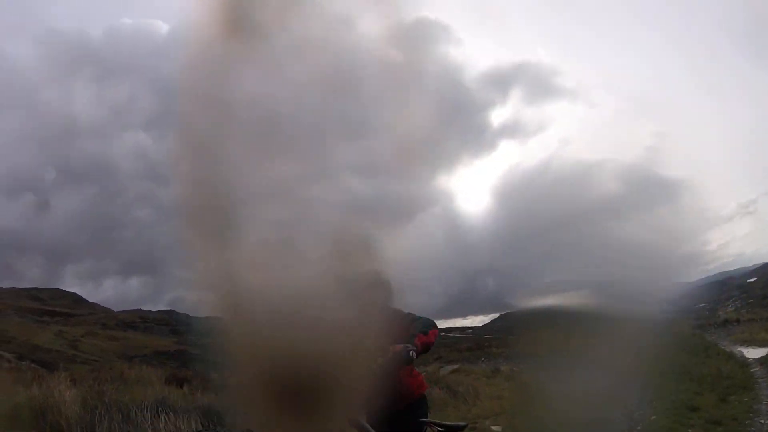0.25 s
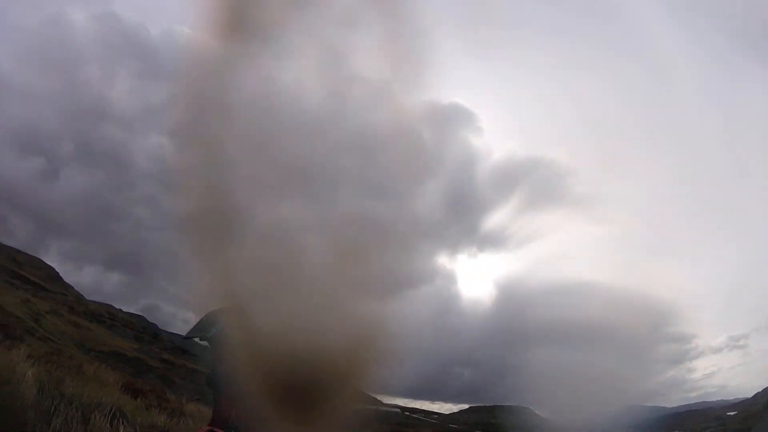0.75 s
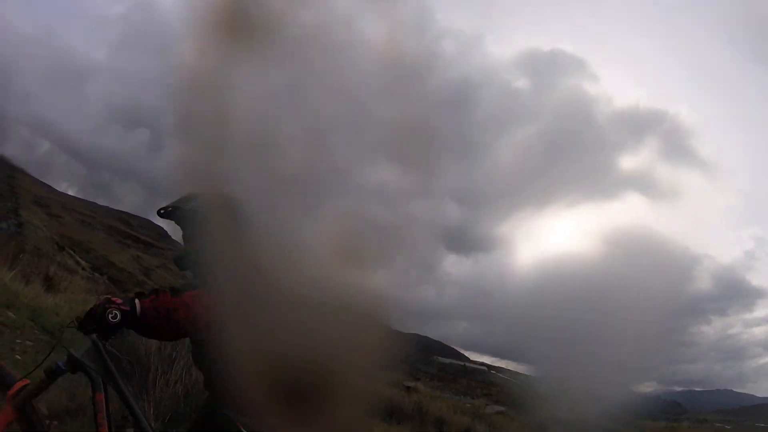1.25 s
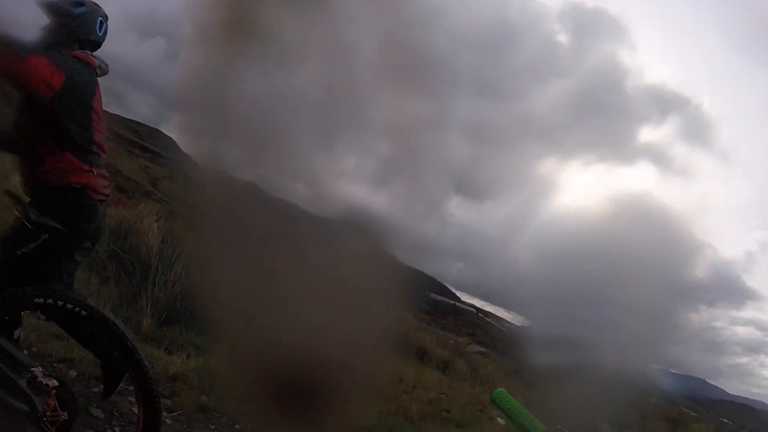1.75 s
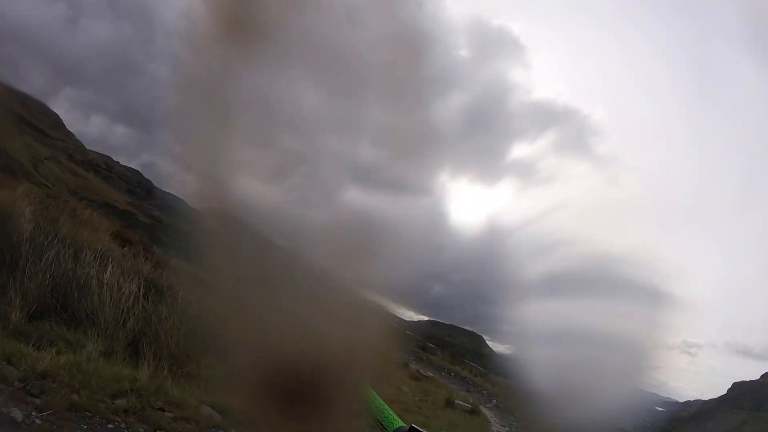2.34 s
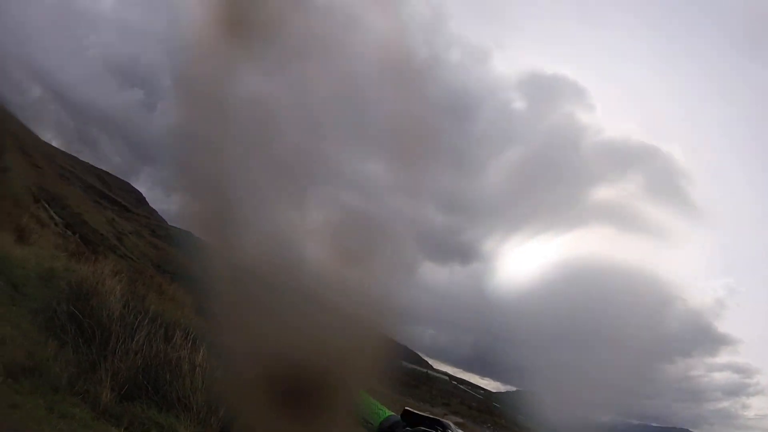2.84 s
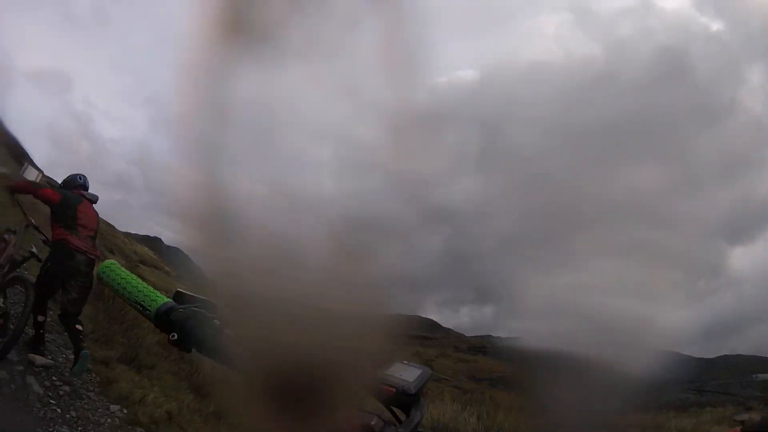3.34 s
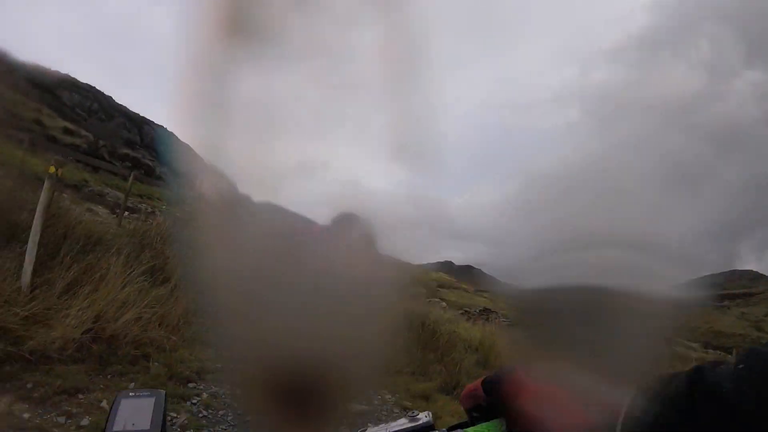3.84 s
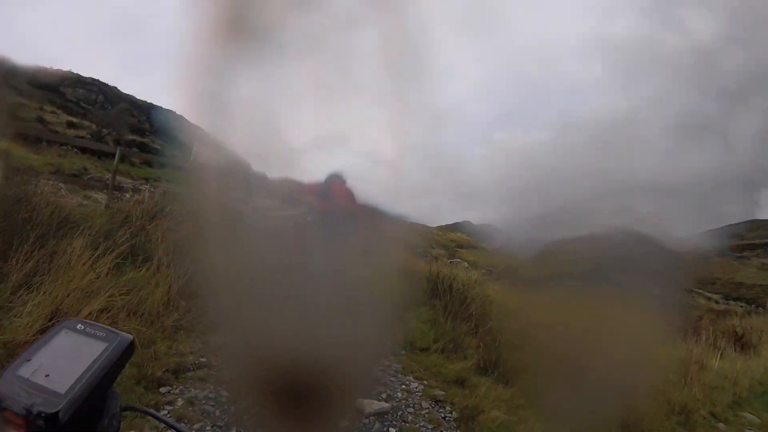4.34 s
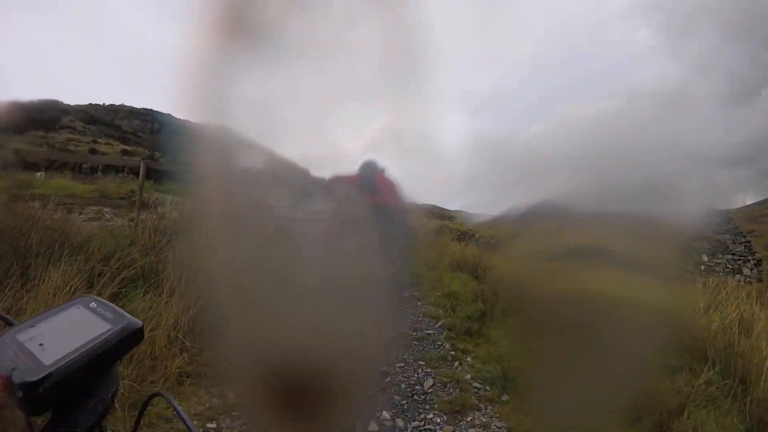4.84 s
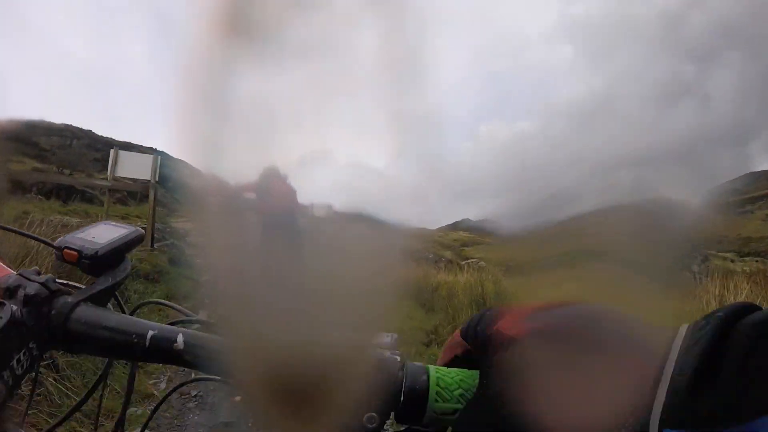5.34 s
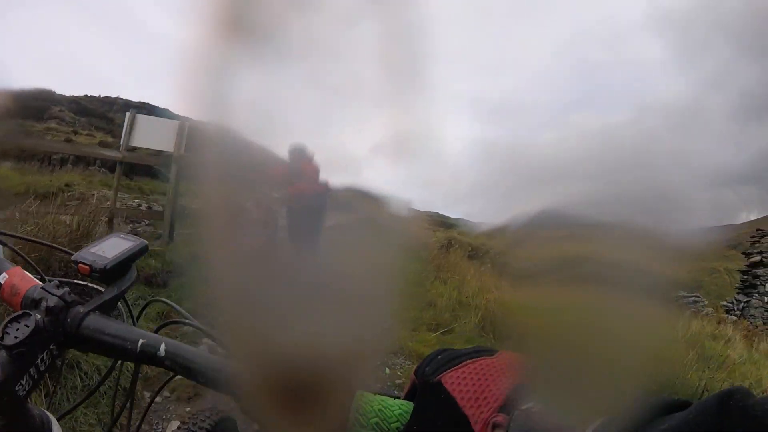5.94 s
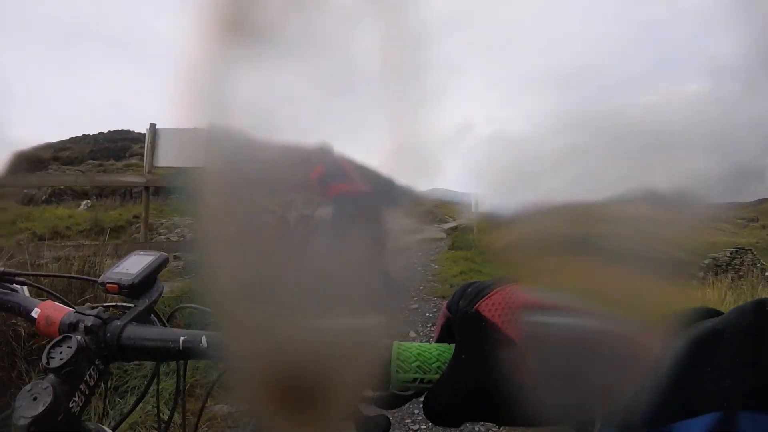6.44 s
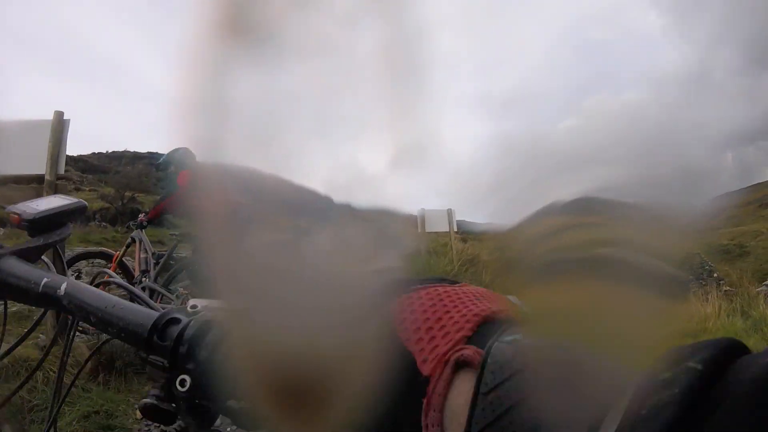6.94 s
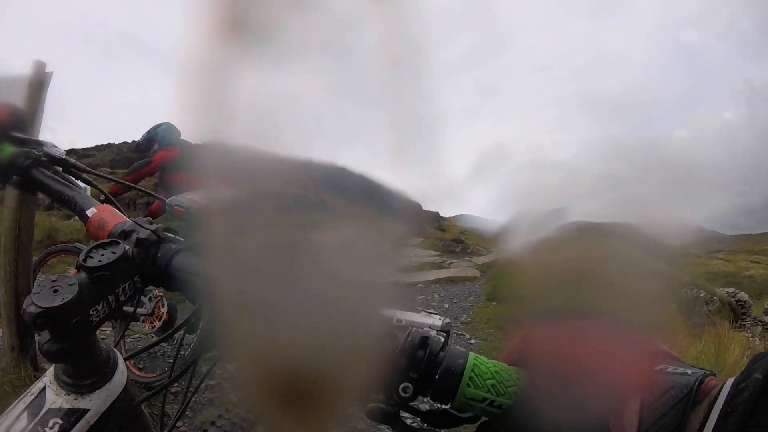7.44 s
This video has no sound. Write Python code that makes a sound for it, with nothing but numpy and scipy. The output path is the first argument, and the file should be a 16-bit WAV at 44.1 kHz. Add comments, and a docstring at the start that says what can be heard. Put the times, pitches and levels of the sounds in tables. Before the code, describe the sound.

Close, dry outdoor sound from a chest microphone: rumbling, uneven wind with heavy pressure pulses almost masks bikes being wheeled over loose stones. A crisp freewheel ticks from just under a second to the end. A hard knock comes past two seconds, then a cluster of stony cracks near four, and frequent boot steps on gravel afterwards.

```python
"""Gusts buffet a microphone port on a rider's chest while mountain bikes are wheeled up a stony moor track.
A freewheel ticks, tyres crunch loose stones, boots land on gravel; snaps, clunks, pings and a scrape are sparse.
Wind is banded noise with eddies, plus single pressure pulses. Stones are random clicks, coloured or ringing.
Tyres, freewheel and boots pass through the resonances of the microphone housing."""
import sys
import numpy as np
from scipy import signal
from scipy.fft import rfft, irfft, next_fast_len
from scipy.io import wavfile
from scipy.ndimage import uniform_filter1d

SR = 44100
rng = np.random.default_rng(int(sys.argv[2]) if len(sys.argv) > 2 else 0)


def transcribe(u):
    """Save the signal u as a 16-bit wav file named by the first command-line argument.

    u: samples, shape (n,) or (channels, n), limited to [-1, 1]; the rate is SR.
    q: integer samples, one column per channel.
    """
    v = np.clip(np.atleast_2d(u).T, -1, 1)
    q = np.round(v * 32767).astype(np.int16)
    wavfile.write(sys.argv[1], SR, q)


N = 338688

# Gusts at the port. Each row: start in seconds, time until the fall in seconds, rumble level in dB,
# edge (extra treble) in dB.
GUSTS = [(-0.03, 0.11, -14.5, -2), (0.135, 0.015, -30, -19), (0.275, 0.017, -25, -6.5),
         (0.392, 0.085, -11.5, -5.5), (0.472, .25, -18, 6), (0.733, 0.11, -21.5, 9),
         (0.861, 0.04, -28, 4.5), (0.919, 0.19, -26.5, 9), (1.126, 0.088, -22.5, 9),
         (1.217, 0.085, -20.5, 8), (1.343, 0.08, -24, 7), (1.46, 0.11, -28, -13.5),
         (1.639, 0.025, -15.5, -6), (1.733, 0.3, -28, 0.5), (2.136, 0.09, -40.5, -11.5),
         (2.429, 0.058, -23.5, -6), (2.551, 0.036, -28, -8.5), (2.681, 0.02, -24.5, -14.5),
         (2.852, 0.049, -20, 1), (2.947, 0.11, -20.5, 0.5), (3.122, 0.21, -32, 10),
         (3.229, 0.055, -15.5, 4.5), (3.292, 0.077, -16.5, 13), (3.378, 0.14, -24, 8.5),
         (3.672, 0.071, -22.5, 4.5), (3.889, 0.19, -23.5, 1), (4.172, 0.39, -29, 4), (4.468, 0.094, -22, 0),
         (4.618, 0.25, -25, 7), (5.172, 0.12, -22.5, -7), (5.374, 0.29, -24.5, 0.5),
         (5.676, 0.092, -16.5, -4.5), (5.84, 0.061, -32.5, 3.5), (6.018, 0.083, -24, -8),
         (6.225, 0.08, -28.5, -11), (6.349, 0.032, -18.5, -1.5), (6.587, 0.07, -25.5, 0),
         (6.7, 0.052, -22.5, -1), (6.777, 0.1, -28, -10.5), (6.929, 0.17, -24, -3),
         (7.15, 0.057, -28.5, -3.5), (7.336, 0.032, -22.5, -3), (7.468, 0.25, -25, -7.5)]
# Breeze between the gusts. Each row: time in seconds, rumble level in dB.
CALM = [(0, -37.5), (2.8, -38.5), (3.3, -24.5), (5.0, -29.5), (7.68, -31.5)]
# Wind spectrum before the edge. Each row: frequency in Hz, relative density in dB.
WIND_SPECTRUM = [(14, 3), (25, 2), (60, 4.5), (110, 0), (220, -7.5), (450, -21), (900, -40), (1800, -63.5),
                 (3000, -74.5), (4500, -85)]
GUST_RISE_S, GUST_FALL_S, CALM_EDGE_DB = 0.019, 0.016, -6
PUSH_SKEW = 0.066  # share of squared churn: pushes taller than pulls

# Strong single eddies. Each row: time in seconds, push level in dB, tear level in dB.
THUMPS = [(0.072, -6, -26), (0.476, -13, -20), (0.518, -16, -4.5), (0.598, -20, -7), (0.704, -23, -10),
          (0.75, -3, -12), (0.835, -5.5, -21), (0.942, -7, -15), (1.238, -8.5, -20), (1.294, -6.5, -25),
          (3.022, -7.5, -13), (4.037, -9, -29.5), (4.499, -11.5, -14), (4.559, -9, -24), (4.713, -3, -16),
          (4.743, -12, -18.5), (4.864, -10, -15), (6.406, -16, -50)]
# Ragged tear on a thump. Each row: frequency in Hz, relative density in dB.
TEAR_SPECTRUM = [(250, 10), (600, 6.5), (1000, -1.5), (1800, -19.5), (3000, -32), (5000, -66)]
THUMP_S, TEAR_T60_S = 0.01154, 0.024

# Boots, knocked stones and, near 0.49 s, a rough burst of wind. Each row: time in seconds,
# crack level in dB, knock level in dB, crunch t60 in seconds, knock pitch in Hz.
STEPS = [(0.45, -46, -11.5, 0.05, 2600), (0.491, -39, -13, 0.13, 880), (2.346, -39, -4, 0.012, 690),
         (3.336, -40.5, -25, 0.2, 885), (3.44, -32.5, -24, 0.16, 2540), (3.843, -29, -5.5, 0.039, 1700),
         (3.878, -29, -8, 0.021, 2000), (3.904, -34, -18, 0.093, 1520), (3.967, -33, -16.5, 0.091, 1200),
         (4.445, -35, -22.5, 0.15, 1000), (4.785, -34.5, -25, 0.18, 2400), (4.902, -37, -14.5, 0.092, 1420),
         (5.136, -38, -18, 0.074, 2160), (5.242, -32, -15, 0.018, 1700), (5.292, -31, -10.5, 0.075, 786),
         (5.535, -39, -17.5, 0.068, 1890), (5.7192, -23, -14, 0.076, 1020),
         (5.7571, -48, -9.5, 0.014, 1460), (6.103, -25, -13.5, 0.076, 1270), (6.171, -34, -22, 0.036, 1350),
         (6.5072, -27.5, -10, 0.046, 700), (6.779, -30.5, -17.5, 0.049, 1730),
         (6.894, -24, -8, 0.079, 1330), (7.067, -39, -22.5, 0.1, 880), (7.278, -32.5, -20, 0.11, 1780),
         (7.3026, -28, -9.5, 0.046, 1650)]
# Cracking part of a step. Each row: frequency in Hz, gain in dB.
CRACK_SPECTRUM = [(800, -8), (1600, -20.5), (3000, 4), (4200, -10), (6000, -1), (9000, -3), (11000, -29),
                  (12500, -50)]
# Knocking part of a step. Each row: frequency in Hz, gain in dB.
KNOCK_SPECTRUM = [(180, -40), (380, 1.5), (650, -3.5), (1000, -11), (1400, -13.5), (2200, -17),
                  (3500, -38.5)]
SOLID_T60_S = 0.021  # the opening click has knock level at this t60, more at shorter ones
KNOCK_WIDTH, KNOCK_RING_DB = 0.51, 8.5  # width as a share of pitch; ring gain before colouring

# Turning of the freewheel. Each row: time in seconds, teeth passed as a running count.
WHEEL_TURN = [(.7458, 0), (.935, 5), (1.1428, 11), (1.2347, 14), (1.341, 17), (1.524, 22), (1.8536, 32),
              (2.006, 37), (2.3206, 48), (2.4667, 53), (2.7137, 62), (2.9337, 71), (3.1073, 77),
              (3.204, 80), (3.4405, 88), (3.5533, 92), (3.8082, 102), (4.4387, 126), (7.1246, 224),
              (7.67, 244)]
# Nearness of the freewheel. Each row: time in seconds, tick level in dB.
TICK_LEVEL = [(.75, -33), (1.0, -35), (1.3, -32), (1.75, -27), (2.3, -35), (2.85, -39), (3.1, -33),
              (3.5, -35.5), (4.5, -34.5), (7.68, -28.5)]
# Pawl on tooth. Each row: frequency in Hz, gain in dB.
PAWL_SPECTRUM = [(900, -68.5), (1600, -20.5), (2600, -8.5), (4200, -22.5), (5500, -12), (8500, -11),
                 (10500, -22.5), (13500, -73.5)]
TICK_SPREAD_DB, TICK_JITTER_S = 1, 0.0019  # standard deviations

# Tyres on loose stones. Each row: time in seconds, fine grit level in dB, coarse stone level in dB.
ROLL = [(0, -44.5, -57), (.2, -50.5, -65), (.5, -46, -51.5), (.94, -56, -71.5), (1.6, -53.5, -65),
        (2.4, -49, -58), (2.9, -50, -64), (3.55, -49, -62.5), (3.94, -40.5, -48.5), (4.2, -47, -60),
        (4.9, -43.5, -56), (6.1, -42.5, -53), (6.45, -44.5, -56), (6.8, -44, -54.5), (7.68, -46, -56.5)]
# Fine grit. Each row: frequency in Hz, gain in dB.
GRIT_SPECTRUM = [(1500, -5.5), (3000, -24), (4200, -16), (5500, -12), (8500, -11.5), (10500, -21),
                 (12500, -41.5)]
# A tyre brushes through grass. Each row: start in seconds, time until the fall in seconds, level in dB.
GRASS_SWISHES = [(0.238, 0.14, -42), (2.44, 0.19, -42.5)]
SWISH_EDGE_S, COARSE_TOP_HZ = 0.029, 3310

# Lone sharp snaps close to the port. Each row: time in seconds, level in dB.
SNAPS = [(0.41, -31), (0.4431, -23.5), (0.698, -23.5), (0.795, -33), (2.3461, -24)]
SNAP_T60_S, SNAP_TOP_HZ = 0.005, 5270

# Hollow clunks of single stones or the frame. Each row: time in seconds, level in dB, pitch in Hz.
CLUNKS = [(2.333, -39, 1860), (2.392, -37.5, 900), (2.461, -37.5, 1220), (2.585, -35.5, 656),
          (2.595, -36, 1220), (2.623, -42, 1280), (2.718, -40.5, 1370), (4.037, -35, 1300),
          (5.994, -34, 2060), (6.601, -36.5, 900)]
CLUNK_T60_CYCLES = 28

# Tiny metallic pings. Each row: time in seconds, level in dB, pitch in Hz.
PINGS = [(2.4862, -37, 4840), (3.2041, -41, 5300), (3.3503, -37, 5180)]
PING_T60_S = 0.029

# Narrow scraping hiss. Each row: start in seconds, time until the fall in seconds, level in dB.
SCRAPES = [(0.662, 0.12, -53)]
SCRAPE_HZ, SCRAPE_WIDTH_HZ = 2070, 220

# Cavities around the port. Each row: resonance in Hz, width in Hz, gain in dB.
HOUSING_MODES = [(5277, 610, 8), (6540, 243, 11.5)]
CAPSULE_HISS_DB = -75.0
CEILING = .58  # full scale = 1
STOP_HZ = 14500  # 60 dB down from here up


def wind():
    """Turbulent pressure at the port: eddies modulate each band, and each gust's edge lifts or cuts the treble."""
    calm = from_db(in_time(CALM)[0])
    strength, weighted_edge = calm, calm * CALM_EDGE_DB
    for start_s, hold_s, db, gust_edge_db in GUSTS:
        blow = from_db(db) * swell(start_s, hold_s, GUST_RISE_S, GUST_FALL_S)
        strength = strength + blow
        weighted_edge = weighted_edge + blow * gust_edge_db
    edge_db = weighted_edge / strength
    lumps, flutter, total = drift(4.7), drift(94.0), 0
    for hz, band in bands(grit(300, 2.2, hiss=0.89), 17.45, count=17):
        height = max(np.log(hz / 85) / np.log(5.0), 0)  # 0 up to 85 Hz, 1 at 425 Hz
        shared_db = (0.98 + 2.1 * height) * lumps + 3.53 * height * flutter
        own_db = (1.98 + 1.4 * height) * drift(33.3)
        band_db = at_hz(WIND_SPECTRUM, hz) + height * edge_db + shared_db + own_db
        total = total + from_db(band_db) * band
    churn = rms_one(total)
    power = churn ** 2
    return strength * (churn + PUSH_SKEW * (power - uniform_filter1d(power, size=2000)))


def thumps():
    """Each eddy is one push and pull of pressure, with a ragged tear that reaches into the mids."""
    s, push_db, tear_db = np.transpose(THUMPS)
    at = (s * SR).astype(int)
    pushes, tears = np.zeros((2, N))
    pushes[at] = from_db(push_db)
    tears[at] = from_db(tear_db)
    turn = np.linspace(0, 1, int(THUMP_S * SR))
    pulse = np.sin(2 * np.pi * turn) * np.sin(np.pi * turn)
    push = signal.fftconvolve(pushes, pulse)[:N]
    tear_level = signal.fftconvolve(tears, burst(TEAR_T60_S, rise_s=0.003))[:N]
    return push + tear_level * rms_one(coloured(rng.standard_normal(N), TEAR_SPECTRUM))


def boots_and_burst():
    """Stones crack underfoot and knock at their own pitch; one rough burst of wind is made the same way."""
    crack_level, knocks = np.zeros((2, N + SR))
    cracks = np.pad(grit(4000, 3.9, hiss=0.55), (0, SR))
    for s, crack_db, knock_db, t60_s, hz in STEPS:
        crunch = burst(t60_s, rise_s=0.097 * t60_s)  # longer ones build more slowly
        first = round(s * SR)
        at = slice(first, first + len(crunch))
        crack_level[at] += from_db(crack_db) * crunch
        blow = from_db(knock_db) * burst(t60_s, rise_s=0.098 * t60_s) * cracks[at]
        blow[0] = from_db(knock_db) * (SOLID_T60_S / t60_s) ** 2
        ring = from_db(KNOCK_RING_DB) * resonance(blow, hz, KNOCK_WIDTH * hz)
        knocks[at] += blow + ring
    crunches = coloured((crack_level * cracks)[:N], CRACK_SPECTRUM)
    return crunches + coloured(knocks[:N], KNOCK_SPECTRUM)


def freewheel():
    """Each pawl snaps over a tooth: a short rattle of hiss."""
    s, teeth = np.transpose(WHEEL_TURN)
    tooth = np.arange(int(teeth[-1]) + 1)
    time_chance, level_chance = rng.standard_normal((2, len(tooth)))
    tick_s = np.interp(tooth, teeth, s) + TICK_JITTER_S * time_chance
    at = (tick_s * SR).astype(int)
    clicks = np.zeros(N)
    clicks[at] = from_db(in_time(TICK_LEVEL)[0][at] + TICK_SPREAD_DB * level_chance)
    level = signal.fftconvolve(clicks, burst(0.031, rise_s=0.0015))[:N]
    return coloured(level * grit(7100, 1.0, hiss=0.25), PAWL_SPECTRUM)


def tyres():
    """Dense grit shifts in clumps, louder through grass; coarse stones sound lower and sparser."""
    fine_db, coarse_db = in_time(ROLL)
    grass = sum(from_db(db) * swell(start_s, hold_s, SWISH_EDGE_S, SWISH_EDGE_S)
                for start_s, hold_s, db in GRASS_SWISHES)
    fine = coloured(grit(2500, 1.4, hiss=0.58) * from_db(2 * drift(15)), GRIT_SPECTRUM)
    coarse = knocked(grit(1200, 2.3, hiss=1.7) * from_db(2.8 * drift(26.0)))
    low_pass = signal.butter(4, COARSE_TOP_HZ, fs=SR, output="sos")
    coarse = signal.sosfilt(low_pass, coarse)
    return np.hypot(from_db(fine_db), grass) * fine + from_db(coarse_db) * coarse


def knocked(x):
    """Larger stones: each sample of x goes at random to one of a dozen short rings; rms 1."""
    dealt = rng.integers(0, 12, N)
    pitches_hz = np.geomspace(700, 3400, 12)
    return rms_one(sum(resonance(x * (dealt == k), hz, 0.26 * hz) for k, hz in enumerate(pitches_hz)))


def snaps():
    """Very short noise cracks with the top rolled off, as of a buckle or strap against the housing."""
    out = np.zeros(N)
    for s, db in SNAPS:
        crack = from_db(db) * burst(SNAP_T60_S, rise_s=.0001)
        out[round(s * SR):][:len(crack)] += crack * rng.choice([-1, 1], len(crack))
    return signal.sosfilt(signal.butter(2, SNAP_TOP_HZ, fs=SR, output="sos"), out)


def clunks():
    """Each is a decaying tone roughened by noise around the same pitch."""
    out = np.zeros(N)
    for s, db, hz in CLUNKS:
        fall = burst(CLUNK_T60_CYCLES / hz, rise_s=0.00053)
        tone = np.sin(2 * np.pi * hz * np.arange(len(fall)) / SR)
        rough = 0.51 * resonance(3.4 * rng.standard_normal(len(fall)), hz, 0.45 * hz)
        out[round(s * SR):][:len(fall)] += from_db(db) * fall * (tone + rough)
    return out


def pings():
    """Short pure rings, as of a spoke or cable flicked by grit."""
    out, fall = np.zeros(N), burst(PING_T60_S, rise_s=0.00081)
    for s, db, hz in PINGS:
        tone = np.sin(2 * np.pi * hz * np.arange(len(fall)) / SR)
        out[round(s * SR):][:len(fall)] += from_db(db) * fall * tone
    return out


def scrapes():
    """Uneven grit through two resonances at one pitch, narrow then wider."""
    level = sum(from_db(db) * swell(start_s, hold_s, 0.0048, 0.081) for start_s, hold_s, db in SCRAPES)
    rub = grit(1500, 3.1, hiss=0.37) * from_db(7.4 * drift(25))
    narrow = resonance(rub, SCRAPE_HZ, SCRAPE_WIDTH_HZ)
    return level * rms_one(resonance(narrow, SCRAPE_HZ, 3 * SCRAPE_WIDTH_HZ))


def housing(x):
    """Cavities around the port add their resonances; the capsule adds a faint hiss."""
    rung = x + sum(from_db(db) * resonance(x, hz, width_hz) for hz, width_hz, db in HOUSING_MODES)
    return rung + from_db(CAPSULE_HISS_DB) * rng.standard_normal(N)


def grit(per_s, spread_db, hiss):
    """Random clicks of uneven size plus hiss (rms relative to the clicks); total rms 1."""
    sizes = from_db(spread_db * np.minimum(rng.exponential(1, N), 5)) * rng.choice([-1, 1], N)
    clicks = sizes * (rng.random(N) < per_s / SR)
    return rms_one(rms_one(clicks) + hiss * rng.standard_normal(N))


def drift(corner_hz):
    """Slow random curve of rms 1: noise through two equal poles, computed every 20 samples."""
    r = np.exp(-2 * np.pi * corner_hz * 20 / SR)
    noise = rng.standard_normal(N // 20 + 2002)
    slow = signal.lfilter([1], [1, -2 * r, r * r], noise)[2000:]  # drop the settling
    return np.interp(np.arange(N) / 20, np.arange(len(slow)), rms_one(slow))


def burst(t60_s, rise_s):
    """Envelope of one contact, 0.25 s long: quick rise, exponential fall."""
    t = np.arange(int(.25 * SR)) / SR
    return (1 - np.exp(-t / rise_s)) * from_db(-60 * t / np.maximum(t60_s, .005))


def swell(start_s, hold_s, rise_s, fall_s):
    """Envelope that rises towards 1, then dies away from hold_s after the start."""
    t = np.arange(N) / SR - start_s
    rise = 1 - np.exp(-np.maximum(t, 0) / rise_s)
    return rise * np.exp(-np.maximum(t - hold_s, 0) / fall_s)


def resonance(x, hz, width_hz):
    """A two-pole peak of about unit gain."""
    r = np.exp(-np.pi * width_hz / SR)
    zeros = [(1 - r * r) / 2, 0, (r * r - 1) / 2]
    poles = [1, -2 * r * np.cos(2 * np.pi * hz / SR), r * r]
    return signal.lfilter(zeros, poles, x)


def bands(x, first_hz, count):
    """Yield centre and signal of overlapping half-octave bands that sum to x between the end centres."""
    size = next_fast_len(N + SR // 2)
    spectrum = rfft(x, size)
    steps = 2 * np.log2(np.fft.rfftfreq(size, 1 / SR) / first_hz + 1e-9)
    for k in range(count):
        weight = np.clip(1 - abs(steps - k), 0, 1)
        yield first_hz * 2 ** (k / 2), irfft(spectrum * weight, size)[:N]


def coloured(x, spectrum):
    """Filter x by a table of gains over frequency."""
    size = next_fast_len(N + SR // 2)
    gain = from_db(at_hz(spectrum, np.fft.rfftfreq(size, 1 / SR) + 1))  # + 1 avoids log(0)
    return irfft(rfft(x, size) * gain, size)[:N]


def at_hz(points, hz):
    """Read a spectrum table on a log frequency axis."""
    table_hz, db = np.array(points).T
    return np.interp(np.log(hz), np.log(table_hz), db)


def in_time(rows):
    """Columns of a time table, interpolated to one value a sample."""
    s, *columns = np.transpose(rows)
    return [np.interp(np.arange(N) / SR, s, c) for c in columns]


def from_db(db):
    """Decibels to gain."""
    return 10 ** (np.asarray(db) / 20)


def rms_one(x):
    """Scale to rms 1."""
    return x / np.sqrt(np.mean(x ** 2) + 1e-20)


def scene():
    """Wind and small close sounds direct; bikes, boots and the rough burst through the housing."""
    at_port = wind() + thumps() + snaps() + clunks() + pings() + scrapes()
    housed = housing(boots_and_burst() + freewheel() + tyres())
    return (at_port + housed)[None]


def record(dry):
    """Round the peaks, then cut the top."""
    rounded = CEILING * np.tanh(dry / CEILING)
    return signal.sosfilt(signal.cheby2(12, 60, STOP_HZ, fs=SR, output="sos"), rounded)


dry = scene()
out = record(dry)
transcribe(out)
```